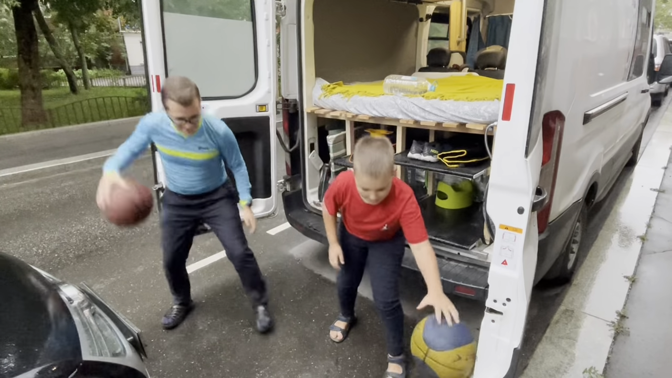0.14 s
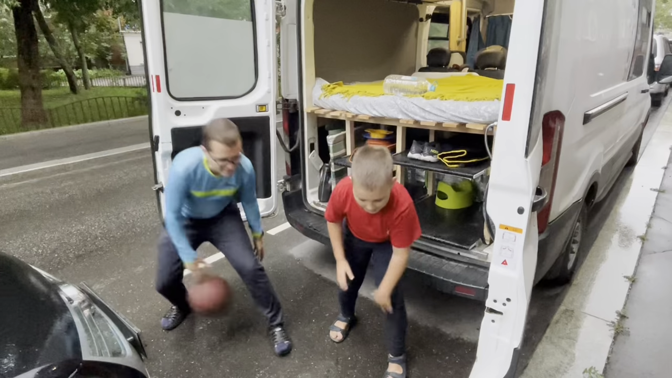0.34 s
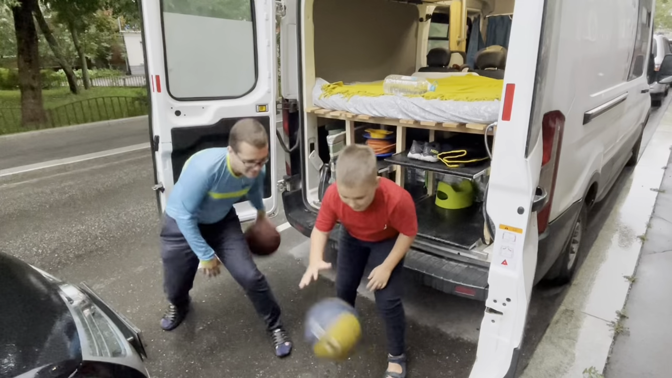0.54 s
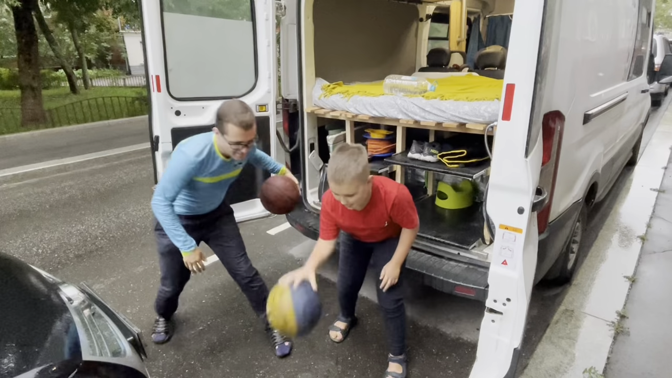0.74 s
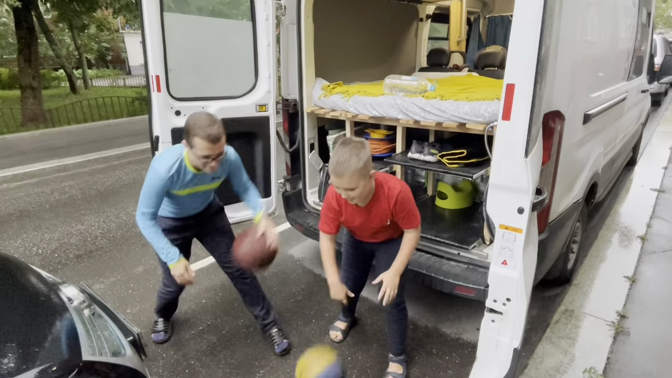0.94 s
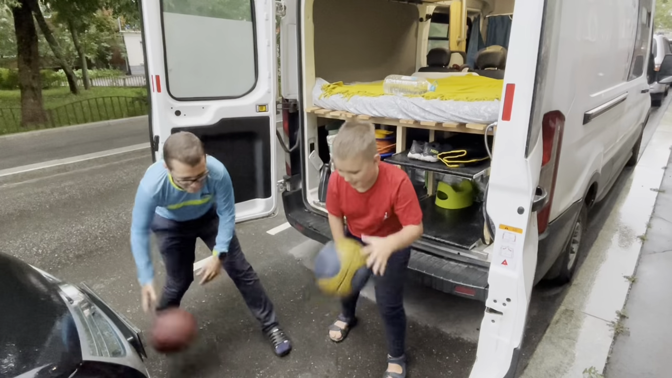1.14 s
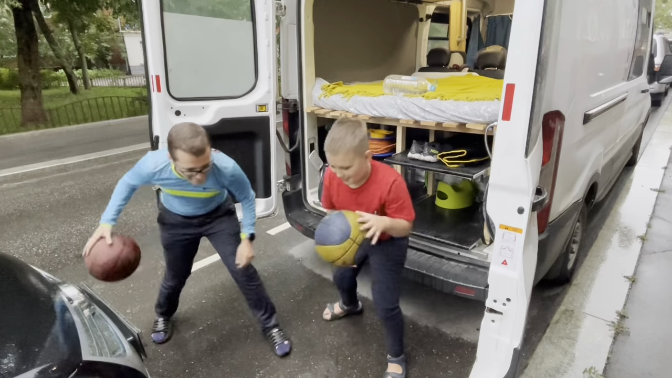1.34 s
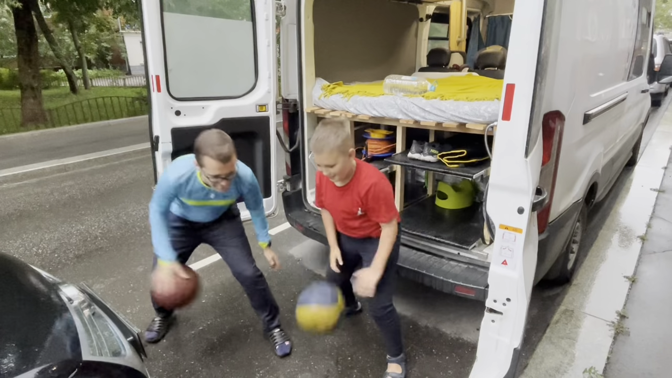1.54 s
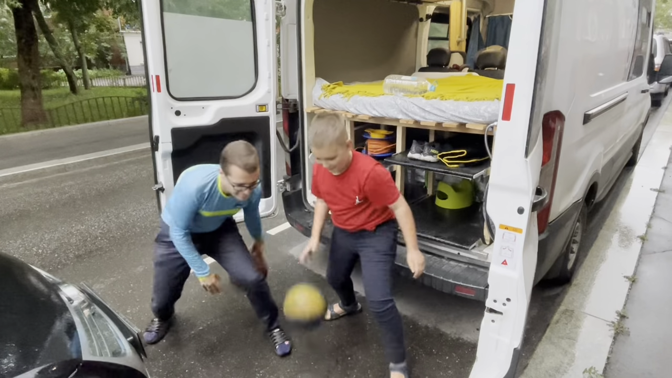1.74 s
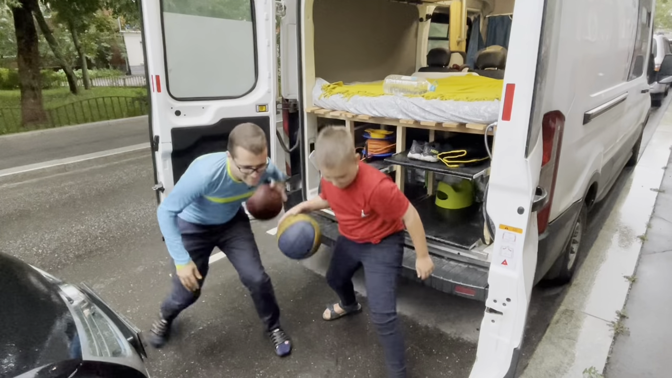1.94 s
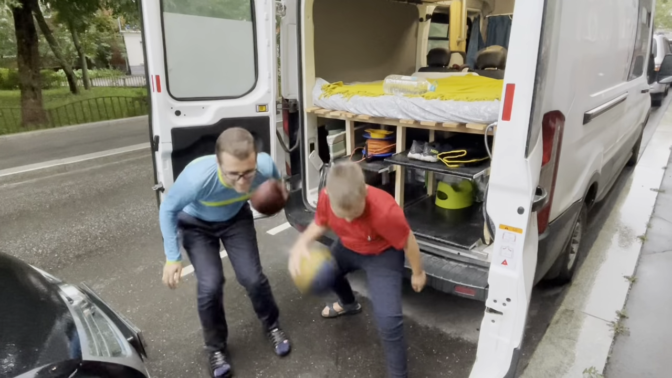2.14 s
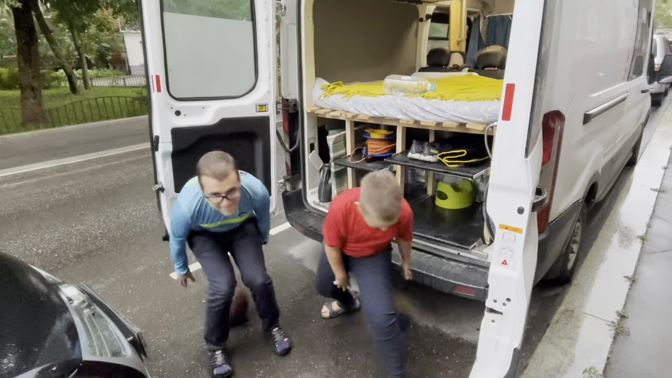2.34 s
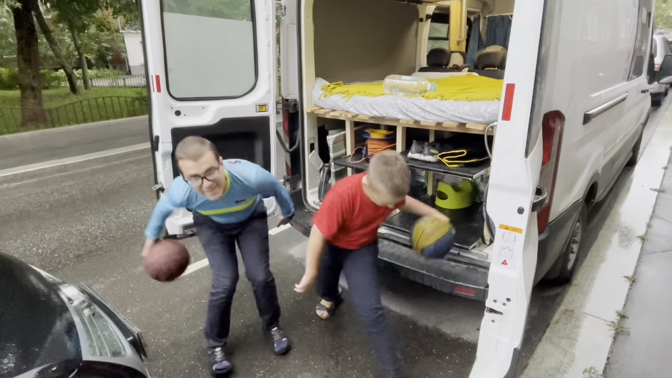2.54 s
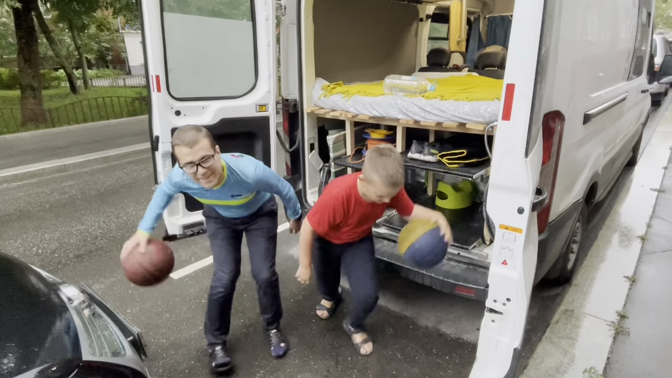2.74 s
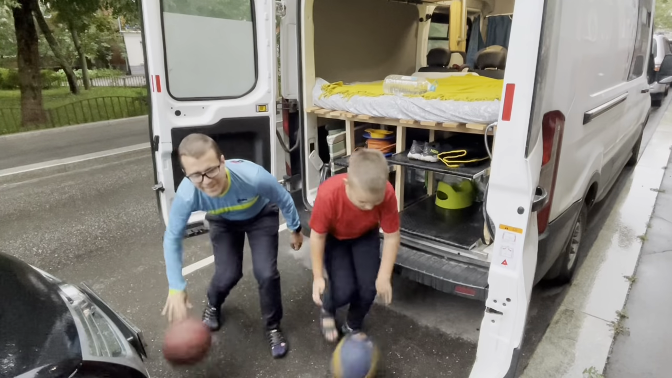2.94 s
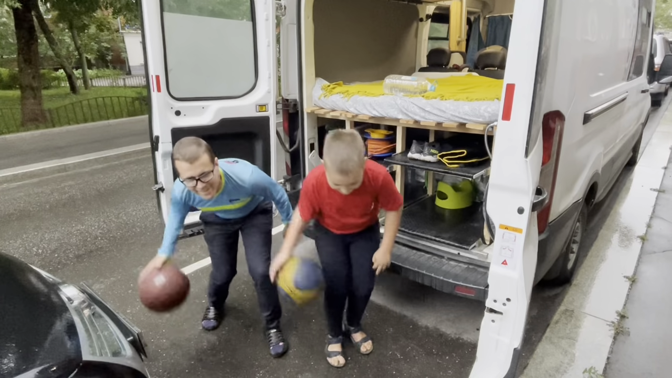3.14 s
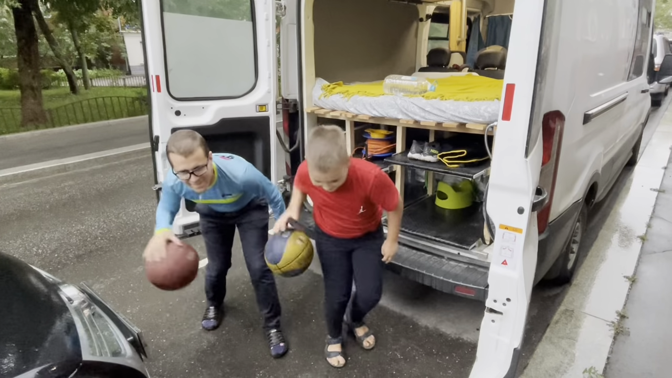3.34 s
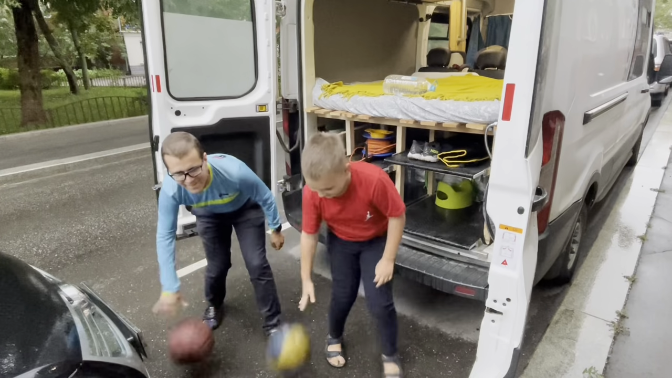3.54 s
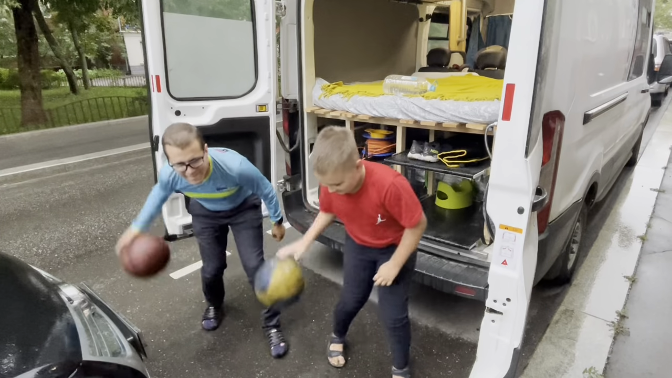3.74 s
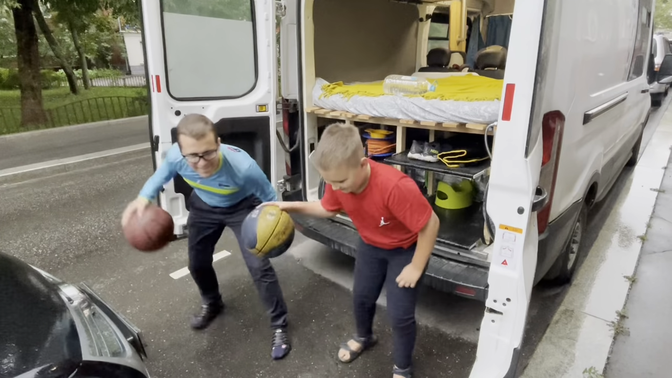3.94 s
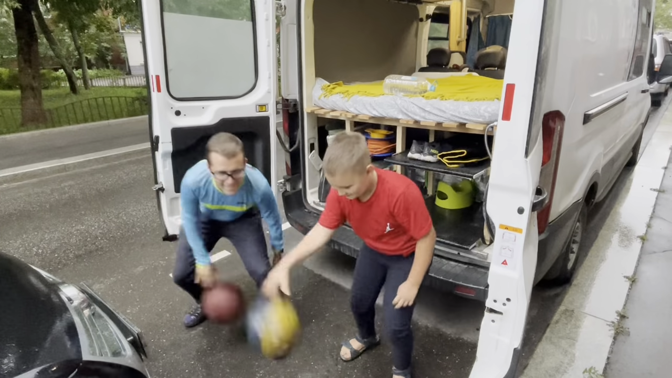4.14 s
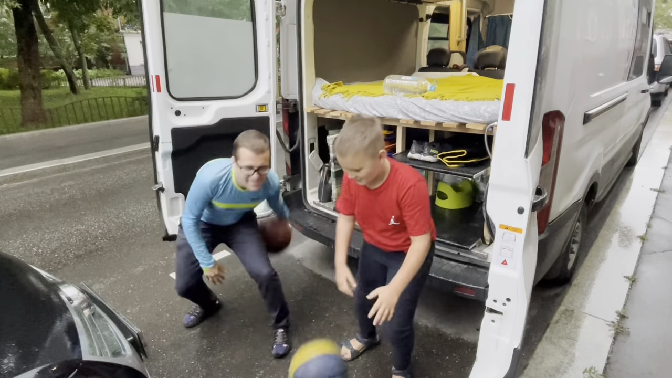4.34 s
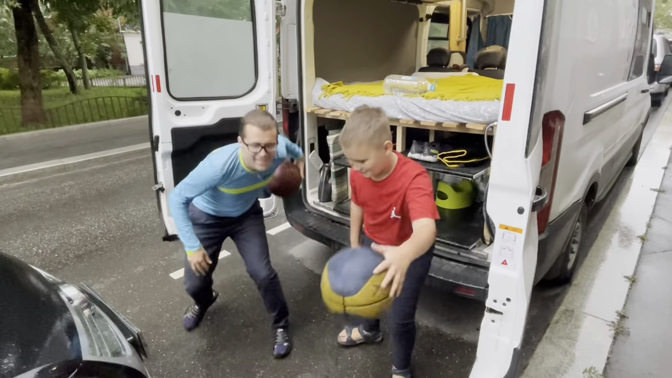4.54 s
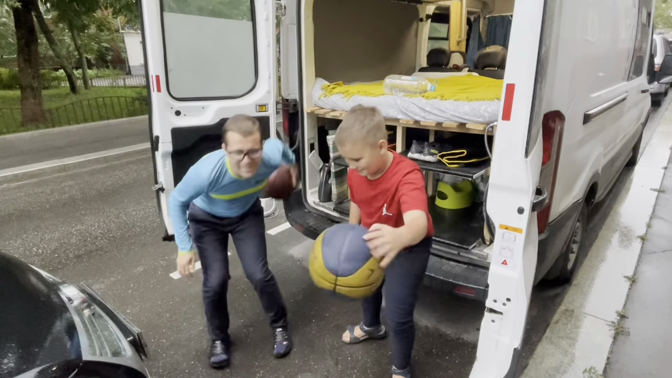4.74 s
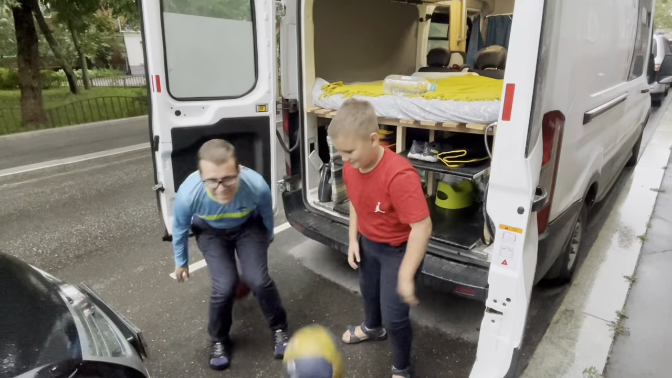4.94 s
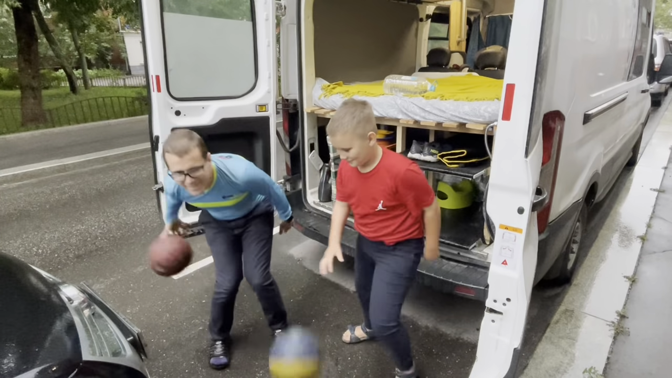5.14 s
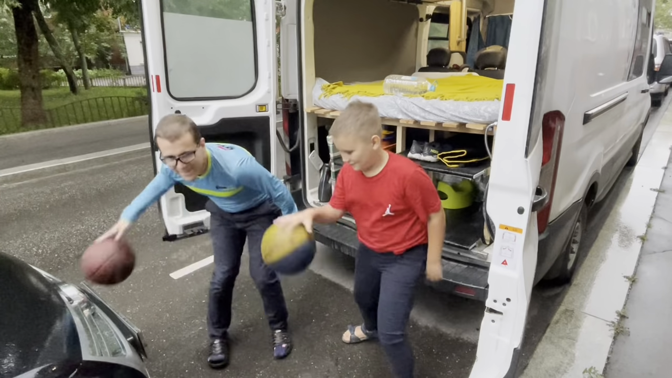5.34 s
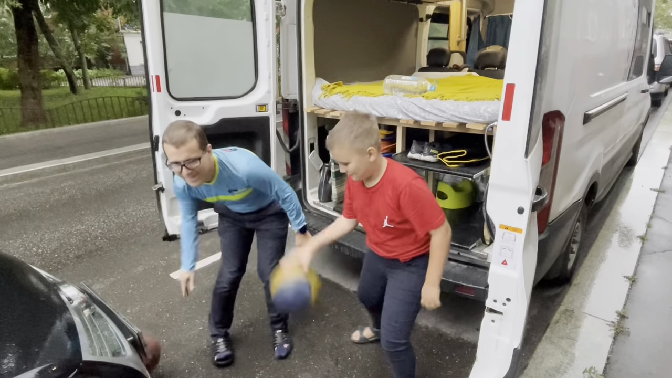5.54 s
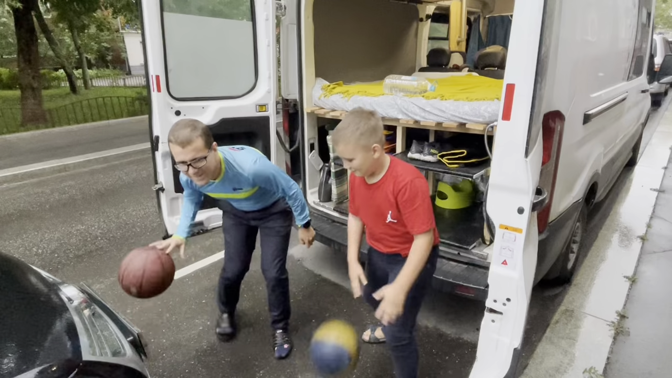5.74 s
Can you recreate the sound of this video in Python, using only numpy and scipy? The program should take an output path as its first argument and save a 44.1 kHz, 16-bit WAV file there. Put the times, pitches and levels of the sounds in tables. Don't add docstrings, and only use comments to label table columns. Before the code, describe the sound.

Two basketballs bounce on street asphalt, sharp thuds falling nearly together or slightly apart, with gritty shoe scrapes and faint distant traffic.

```python
import sys
import numpy as np
from scipy import signal
from scipy.fft import rfft, irfft
from scipy.io import wavfile
from scipy.ndimage import uniform_filter1d

SR = 44100
rng = np.random.default_rng(int(sys.argv[2]) if len(sys.argv) > 2 else 0)


def invert_db(level):
    return 10 ** (np.asarray(level, dtype=float) / 20)


def unload_audio(sound):
    columns = np.transpose(np.atleast_2d(sound))
    steps = np.round(np.clip(columns, -1, 1) * 32767)
    wavfile.write(sys.argv[1], SR, steps.astype(np.int16))


N = 256220
HZ = np.fft.rfftfreq(2 ** 18, 1 / SR) + 1e-6


def shape(x, response):
    return irfft(rfft(x, 2 * len(HZ) - 2) * response)[..., :N]


def curve(points):
    hz, db = np.transpose(points)
    return invert_db(np.interp(np.log(HZ), np.log(hz), db))


def colour(x, points):
    return shape(x, curve(points))


def unit(x):
    return x / np.sqrt(np.mean(x ** 2))


def band(x, hz, width_hz):
    return signal.lfilter(*signal.iirpeak(hz, hz / width_hz, SR), x)


def low_pass(x, hz):
    return signal.lfilter(*signal.butter(1, hz, fs=SR), x)


def add(out, start_s, x):
    i = int(start_s * SR)
    out[i:i + len(x)] += x[:N - i]


def fade(t, t60):
    return (t >= 0) * invert_db(-60 * np.maximum(t, 0) / t60)


def walk(rate_hz):
    hold = int(SR / rate_hz)
    steps = np.repeat(rng.standard_normal(N // hold + 1), hold)
    return unit(uniform_filter1d(uniform_filter1d(steps, hold), hold)[:N])


def diffuse(mono_hz, most, size=2 ** 18):
    mid, side = rfft(rng.standard_normal((2, size)))
    hz = np.linspace(0, SR / 2, len(mid))
    share = np.minimum((hz / mono_hz) ** 0.91, most) / (1 + (hz / 9500) ** 12)
    pair = np.array([mid + share * side, mid - share * side]) / np.sqrt(1 + share ** 2)
    return irfft(pair, size)[:, :N]


# pitch_hz, level_db (per Hz)
TRAFFIC_COLOUR = [(22, -47), (32, -33), (42, 2.5), (57, 1.5), (100, -6), (141, -8), (200, -9.5), (350, -13),
                  (700, -18.5), (1200, -21.5), (2600, -31.5), (6500, -33), (10000, -42), (16000, -77)]
# start_s, level_db
RUSTLE_LEVEL = [(0.0, -69), (0.42, -77), (0.55, -70), (1.08, -71.5), (1.3, -70), (1.6, -70.5),
                (2.26, -70.5), (2.45, -65), (2.68, -73), (3.23, -67), (3.55, -76), (3.8, -65.5),
                (4.03, -76), (4.4, -66), (4.79, -77.5), (5.3, -66.5), (5.55, -82), (5.81, -70.5)]


def background():
    hum = rfft(unit(colour(diffuse(590, 1.0), TRAFFIC_COLOUR)), 2 * len(HZ) - 2)
    out, swell_db = 0, walk(0.99)
    start_s, db = np.transpose(RUSTLE_LEVEL)
    rustle_db = np.interp(np.arange(N) / SR, start_s, db - np.mean(db))
    for octave in range(10):
        weight = np.clip(1 - np.abs(np.log2(HZ / 30) - octave), 0, 1)
        flicker_db = 1.92 * walk(10) + 0.82 * walk(33)
        level_db = swell_db + flicker_db + np.clip((octave - 3) / 4, 0, 1) * rustle_db
        out = out + invert_db(level_db) * irfft(hum * np.sqrt(weight))[:, :N]
    return invert_db(-63) * out


# start_s (after the direct sound), level_db
FIRST_RETURNS = [
    (.035, -18.5),
    (0.064, -25),
    (.09, -25),
]


def street(dry, near_t60, near_db, far_t60, far_db, dull_hz, thin_hz):
    step, t, wet = SR // 3, np.arange(16384) / SR, np.zeros((2, N + SR))
    near = invert_db(near_db) * fade(t - .003, near_t60)
    near = near + sum(invert_db(db - 21) * fade(t - start_s, 0.029) for start_s, db in FIRST_RETURNS)
    far = invert_db(far_db) * fade(t - .02, far_t60)
    thin = signal.lfilter(*signal.butter(2, thin_hz, "high", fs=SR), dry)
    for i in range(0, N, step):
        trees = low_pass(diffuse(1300, 1.0, size=len(t)), dull_hz)
        paths = diffuse(690, 1.0, size=len(t)) * near + trees * far
        part = signal.fftconvolve(thin[None, i:i + step], paths, axes=1)
        wet[:, i:i + part.shape[1]] += part
    return wet[:, :N]


# pitch_hz, level_db (per Hz)
GRIT_COLOUR = [(700, -62), (1200, -4), (1800, -1), (4800, -3.5), (6400, -5), (8000, -8.5), (10600, -13.5),
               (13000, -21.5), (15700, -6.5), (16200, -60)]


def grit(grain_rate, spread_db, sharpness):
    out, count = np.zeros((2, N)), N // 16
    for hz in 900 * 2 ** np.arange(0, 4.2, .4):
        when, chance, size = rng.integers(0, N, count), rng.random(count), rng.exponential(size=count)
        struck = chance < grain_rate * N / SR / count
        hits = np.zeros((2, N))
        hits[:, when] = rng.standard_normal((2, count)) * invert_db(spread_db * size) * struck
        out += band(hits, hz, hz / sharpness) * invert_db(2.5 * walk(40))
    side = shape(out[1], 0.97 / (1 + (HZ / 9500) ** 12))
    return unit(colour(np.array([out[0] + side, out[0] - side]), GRIT_COLOUR))


# peak_s, level_db, swell_s, release_s, low_db (relative)
SOLE_SCRAPES = [(0.075, -72, 0.017, 0.027, -10), (0.258, -63, 0.045, 0.046, -5),
                (0.74, -61, 0.051, 0.048, -7), (2.033, -66, 0.014, 0.044, -4),
                (2.156, -59.5, 0.11, 0.058, -6), (2.625, -59, 0.025, 0.13, 1),
                (2.69, -77, 0.068, 0.071, -12), (2.745, -46.5, 0.065, 0.053, -8),
                (2.84, -73, 0.08, 0.05, -8), (3.33, -86, 0.023, 0.08, -23), (3.955, -65, 0.025, 0.1, -5),
                (3.994, -61, 0.077, 0.031, -3.5), (4.735, -62.5, 0.033, 0.058, -1),
                (4.76, -65, 0.057, 0.039, -3), (5.279, -55.5, 0.023, 0.029, 1.5),
                (5.5, -72, 0.038, 0.05, -13.5), (5.555, -55.5, 0.051, 0.12, -4.5),
                (5.63, -63, 0.12, 0.068, 2)]
# pitch_hz, width_hz, level_db
SOLE_RESONANCES = [(600, 155, 3.5), (1000, 370, 6.5), (1250, 950, 2)]


def scrapes():
    t = np.arange(0, N + 32, 32) / SR
    high, low = invert_db(np.interp(t, *np.transpose(RUSTLE_LEVEL)) - 4.5), 0
    for peak_s, db, swell_s, release_s, low_db in SOLE_SCRAPES:
        away = np.maximum((peak_s - t) / swell_s, (t - peak_s) / release_s)
        drag = invert_db(db - 20 * away ** 1.47)
        high = high + invert_db(2.5) * drag
        low = low + invert_db(low_db + 1.0) * drag
    high, low = (np.interp(np.arange(N) / SR, t, level) for level in (high, low))
    hit = rng.random(N) < 1500 / SR
    knocks = hit * invert_db(3.8 * rng.exponential(size=N)) * rng.standard_normal(N)
    sole = sum(invert_db(db) * band(band(knocks, hz, width), hz, width) for hz, width, db in SOLE_RESONANCES)
    return high * grit(2000, 2.24, sharpness=5.6) + low * unit(sole)


# start_s, level_db, pitch_hz, t60_s
HAND_TICKS = [(0.006, -47, 4520, 0.037), (0.185, -57, 6760, 0.035), (0.203, -62, 6960, 0.035),
              (0.2257, -50, 6500, 0.14), (0.5512, -49, 6110, 0.035), (0.8, -63, 4000, 0.035),
              (0.866, -50, 5970, 0.075), (1.479, -59, 4570, 0.042), (1.5569, -51, 3320, 0.04),
              (1.6377, -57, 6920, 0.025), (1.768, -51, 5420, 0.041), (1.8148, -48.5, 4260, 0.094),
              (1.873, -51, 4630, 0.031), (2.0283, -52, 4600, 0.034), (2.2927, -64, 4200, 0.035),
              (2.5242, -46.5, 6160, 0.026), (2.595, -52, 5000, 0.04), (2.617, -50, 4900, 0.047),
              (2.665, -43, 4650, 0.038), (3.321, -47.5, 6900, 0.056), (3.5398, -52, 6800, 0.031),
              (3.7824, -59.5, 6400, 0.032), (4.073, -50, 3400, 0.084), (4.1758, -52, 5310, 0.035),
              (4.4, -51.5, 6580, 0.056), (4.4481, -40, 4100, 0.023), (4.9736, -50, 3370, 0.038),
              (5.2335, -43, 5670, 0.024), (5.264, -60, 4660, 0.035), (5.5194, -38.5, 4200, 0.05)]
# start_s, level_db, pitch_hz, length_s
RUBBER_SQUEAKS = [
    (2.112, -63, 700, 0.018),
    (2.138, -51, 1410, 0.019),
    (2.69, -44.5, 1075, 0.011),
    (2.748, -56, 574, 0.028),
    (4.774, -62, 1070, 0.0084),
]


def ticks():
    out, t = np.zeros(N), np.arange(SR // 10) / SR
    onset = np.minimum(t / 0.00059, 1)
    for start_s, db, hz, t60 in HAND_TICKS:
        burst = rng.standard_normal(len(t)) * fade(t, 1.6 * t60) * onset
        add(out, start_s, invert_db(db - 3.0) * band(band(burst, hz, 0.69 * hz), hz, 0.69 * hz))
    for start_s, db, hz, length_s in RUBBER_SQUEAKS:
        swell = np.sin(np.pi * np.clip(t / length_s, 0, 1))
        add(out, start_s, invert_db(db) * np.sin(2 * np.pi * hz * t) * swell)
    return out


# start_s, slap_db, thud_db, peel_db (re slap), knock_db (re thud)
FAR_BOUNCES = [
    (0.4222, -21, -35, -22, -12),
    (1.1238, -22.5, -33, -8.5, -14),
    (1.6772, -25.5, -33.5, -10, -35),
    (2.378, -31, -36, -4, -12),
    (3.0173, -22.5, -34, -4, -10),
    (3.5972, -27, -37, -4.5, -22),
    (4.2213, -30.5, -36, -0.5, -6.5),
    (5.0065, -28, -35.5, -15, -14),
    (5.5456, -30, -32, -1, -14),
]
NEAR_BOUNCES = [
    (0.3628, -30, -34, -3, -12),
    (0.9134, -24.5, -31, -7.5, -16.5),
    (1.6899, -28.5, -35.5, 2, -11.5),
    (2.3185, -28, -34, -3.5, -17.5),
    (2.9971, -20.5, -31.5, -34, -20),
    (3.6059, -23, -32.5, -7.5, -20.5),
    (4.2704, -31, -30.5, 3.5, -14.5),
    (5.0795, -26, -31, -7.5, -17),
    (5.7005, -26.5, -32, -4, -17.5),
]
# pitch_hz, level_db, t60_s
FAR_RING = [(245, 1, 0.09), (458.5, -3.5, 0.18), (545, 4.5, 0.076), (794, 7, 0.045), (939, -11, 0.058),
            (1450, -41, 0.012), (1690, 1.5, 0.013), (2000, -5.5, 0.016)]
# pitch_hz, level_db, t60_s
NEAR_RING = [(256.4, 8.5, 0.088), (436, 8, 0.083), (551, 1.5, 0.096), (748, 7, 0.05), (1256, -8.5, 0.02),
             (1800, -14.5, 0.017), (2250, 0.5, 0.0098)]
# pitch_hz, level_db (per Hz)
SLAP_COLOUR = [(120, -22), (300, -6), (450, -5.5), (830, -14), (1400, -9), (2200, -18), (4200, -18.5),
               (6300, -20), (8000, -25.5), (10500, -31), (13000, -40), (15800, -26), (16400, -62)]


def ball(bounces, modes, contact_s, click_db, slap_t60, peel_t60, hiss_db, ping_db):
    thud, ring, t = np.zeros(N), np.zeros(N), np.arange(SR // 5) / SR
    click, crackle, weight = np.zeros(N), np.zeros(N), np.ones(N)
    squash = np.clip(t / contact_s, 0, 1) ** .865
    push = np.gradient(np.abs(np.sin(np.pi * squash)) ** 2.17)
    push = push / np.std(push[:SR // 100])
    lift = t - 1.084 * contact_s
    for start_s, slap_db, thud_db, peel_db, knock_db in bounces:
        add(thud, start_s, invert_db(thud_db + 9.0) * push)
        air_db = slap_db + click_db + 0.44 * (thud_db - slap_db + 9)
        add(click, start_s + 0.0007, -invert_db(air_db) * np.hanning(5))
        weight[int(start_s * SR):] = invert_db(0.75 * (thud_db - slap_db + 6.5))
        peel = invert_db(peel_db) * np.where(lift < 0, np.exp(lift / 0.0019), fade(lift, peel_t60))
        contact = fade(t, slap_t60) + peel + invert_db(hiss_db) * fade(t, 0.21)
        add(crackle, start_s + 0.00033, invert_db(slap_db) * contact)
        for (hz, db, t60), (detune, spread) in zip(modes, rng.standard_normal((len(modes), 2))):
            tone = np.sin(2 * np.pi * hz * (1 + 0.04 * detune) * t) * fade(t, t60)
            blow_db = thud_db + knock_db if hz < 800 else slap_db + ping_db
            add(ring, start_s + 0.00052, invert_db(blow_db + db + 2.0 * spread) * tone)
    s = 1j * HZ
    radiation = s * s / (s * s + s * 91 / .72 + 91 ** 2)
    radiation = radiation * s * s / (s * s + s * 100 + 72 ** 2)
    slap = click + crackle * diffuse(1440, 0.77)
    slap = slap + low_pass(slap * (weight - 1), 1100)
    return shape(thud, radiation) + ring + invert_db(11.5) * colour(slap, SLAP_COLOUR)


def scene():
    far = ball(FAR_BOUNCES, FAR_RING, contact_s=0.0108, click_db=7.0, slap_t60=0.014, peel_t60=0.039,
               hiss_db=-13.0, ping_db=-5.5)
    near = ball(NEAR_BOUNCES, NEAR_RING, contact_s=0.01014, click_db=6, slap_t60=0.012, peel_t60=0.022,
                hiss_db=-10.5, ping_db=-8.5)
    dry = far + near + scrapes() + ticks()
    wet = street(dry.mean(axis=0), near_t60=0.086, near_db=-35, far_t60=0.53, far_db=-49.5,
                 dull_hz=5200, thin_hz=114)
    return dry + wet + background()


def band_limit(x):
    return signal.sosfilt(signal.butter(12, 16490, fs=SR, output="sos"), x)


# pitch_hz, lead_rad
LEFT_LEAD = [(0, 0), (1550, 1.8), (2330, 1.3), (3190, 2.4), (3790, 2.3), (4570, 5.9), (5000, 5.6),
             (5860, 9.7), (6370, 6.6), (7920, 9.1), (10200, 6.4), (12300, 6.1), (13200, 3.7), (14300, 2.9),
             (16000, 2.35)]
# pitch_hz, level_db (left minus right)
LEFT_TILT = [(60, 0), (250, -.6), (1000, .4), (2400, 1.5), (4400, 4.5), (7500, 5.5), (9500, 0), (16000, 0)]


def record(dry):
    s = 1j * HZ
    chain = s / (s + 22) / (1 + (HZ / 16000) ** 60)
    for hz in 106 * 1.371 ** np.arange(8):
        chain = chain * (hz - s) / (hz + s)
    lead_rad = np.interp(HZ, *np.transpose(LEFT_LEAD))
    half = np.sqrt(curve(LEFT_TILT)) * np.exp(.5j * lead_rad)
    mix = shape(dry, chain * np.array([half, 1 / half]))
    return band_limit(mix)


dry = scene()
out = record(dry)
unload_audio(out)
```